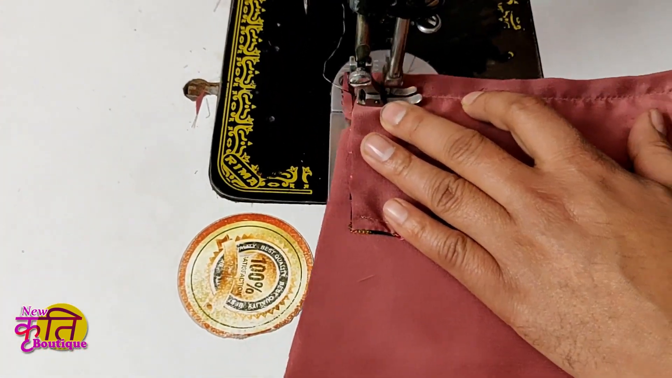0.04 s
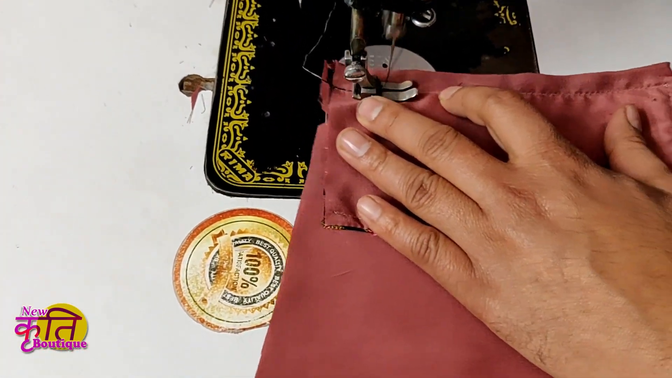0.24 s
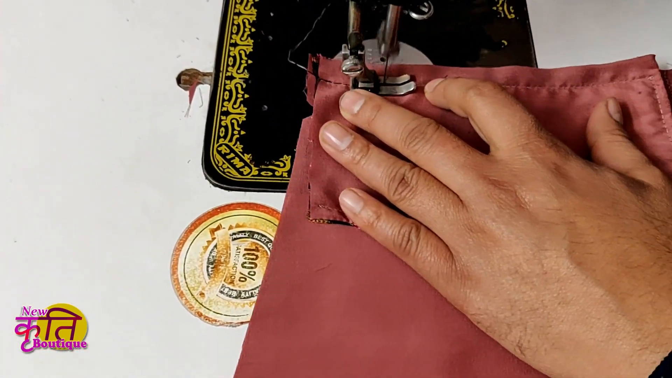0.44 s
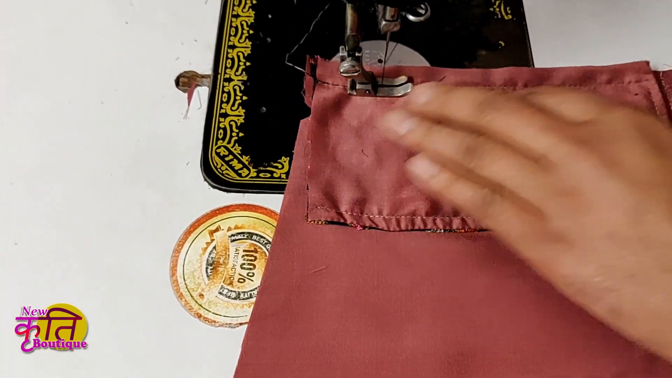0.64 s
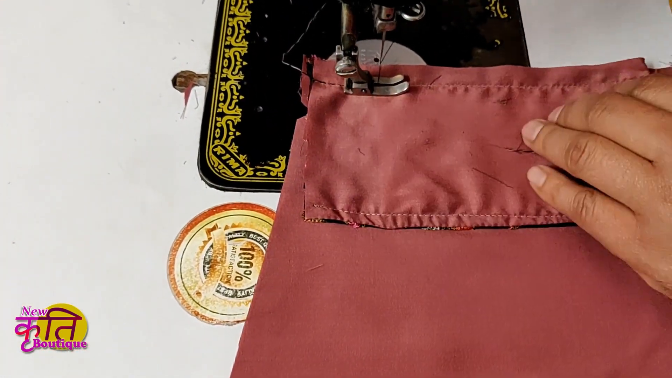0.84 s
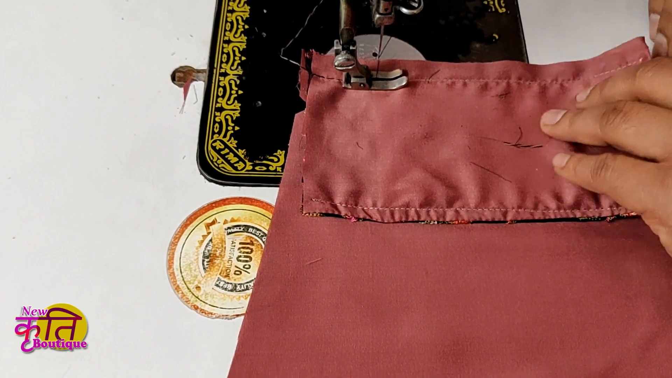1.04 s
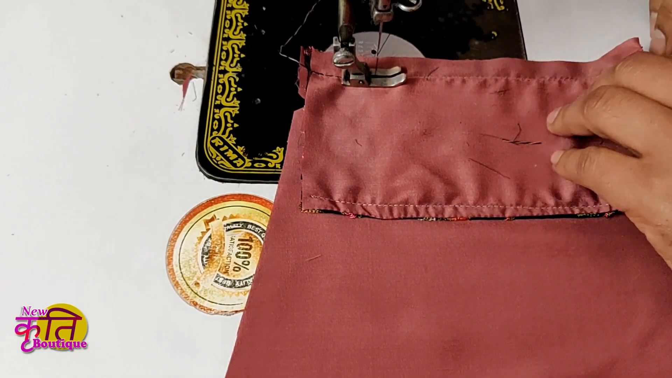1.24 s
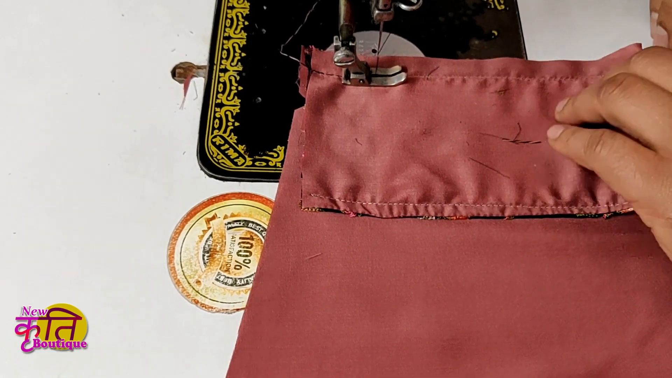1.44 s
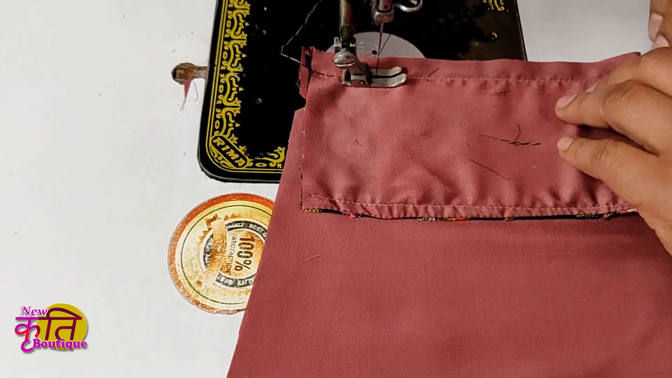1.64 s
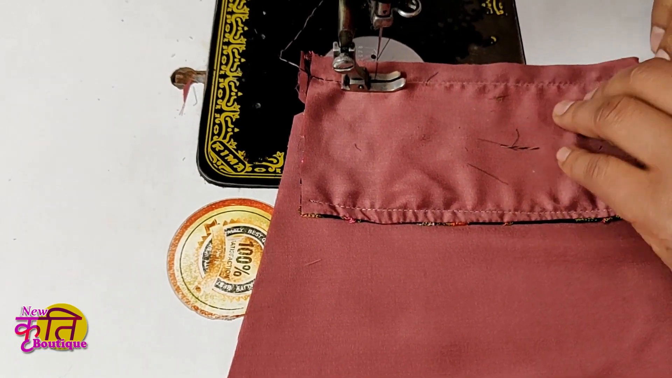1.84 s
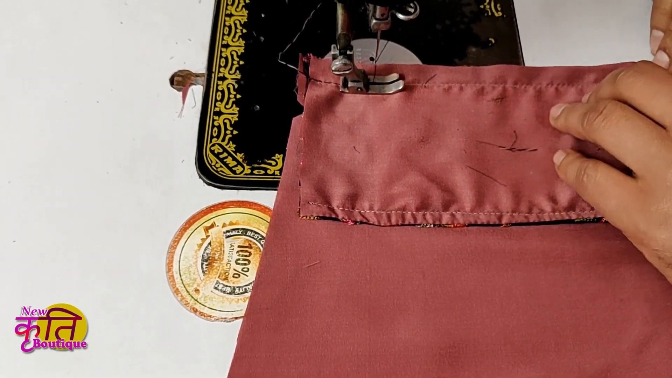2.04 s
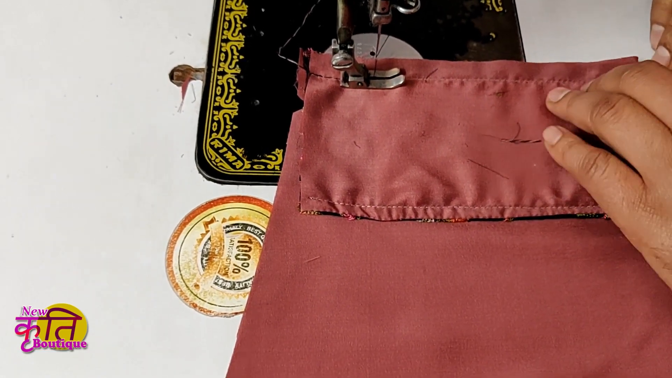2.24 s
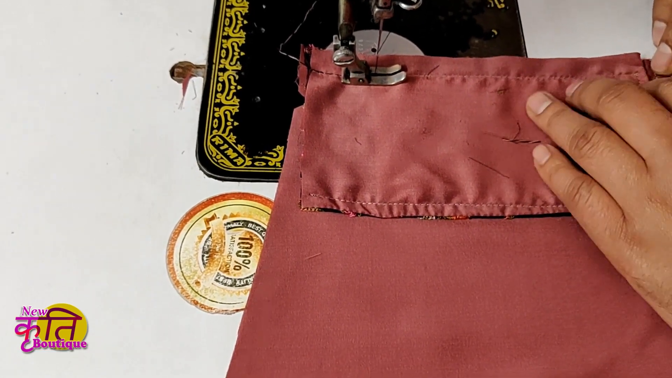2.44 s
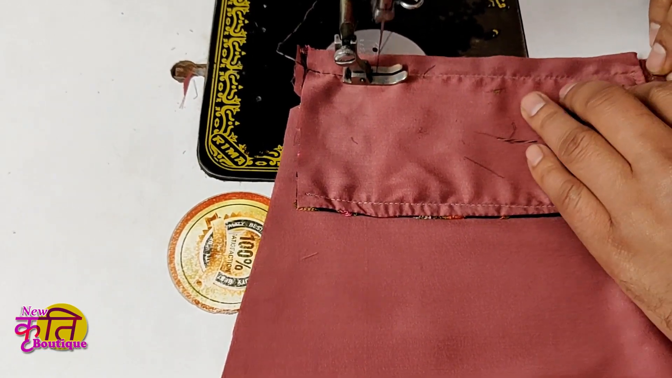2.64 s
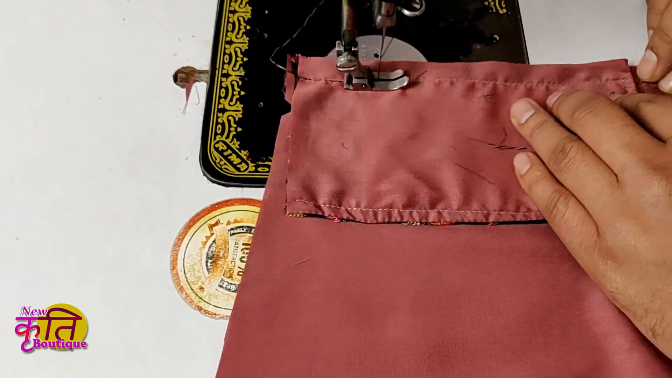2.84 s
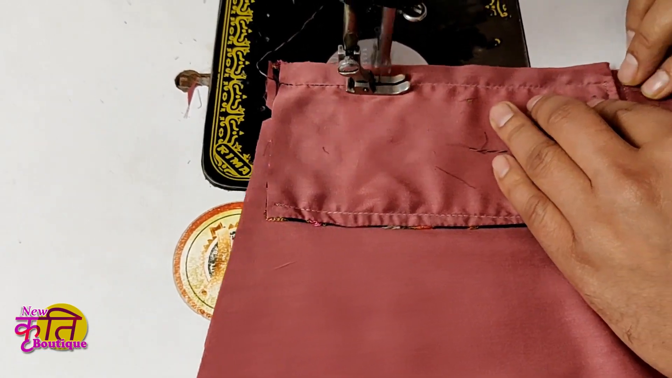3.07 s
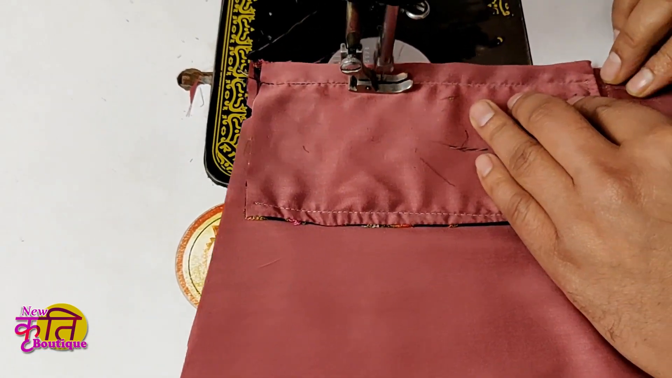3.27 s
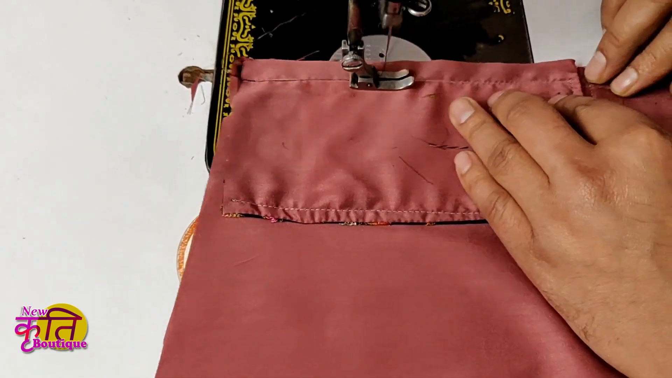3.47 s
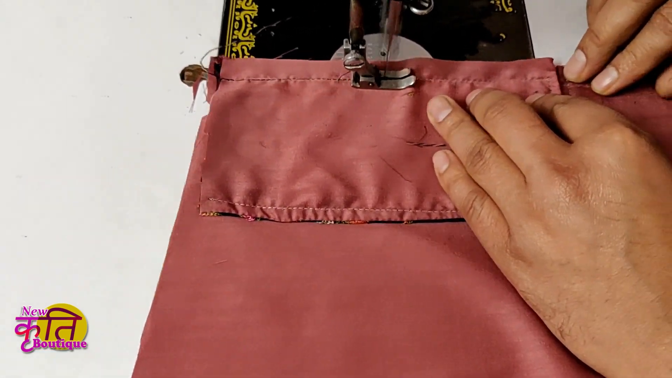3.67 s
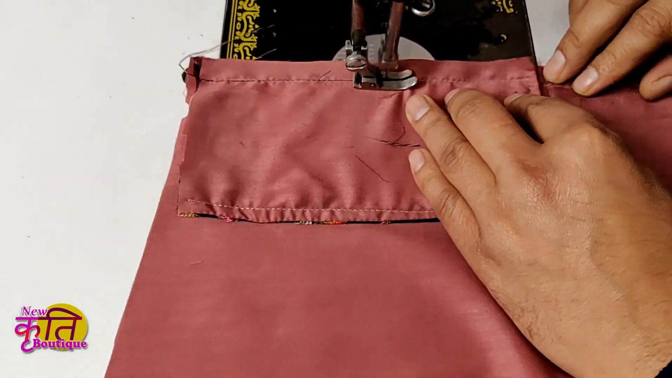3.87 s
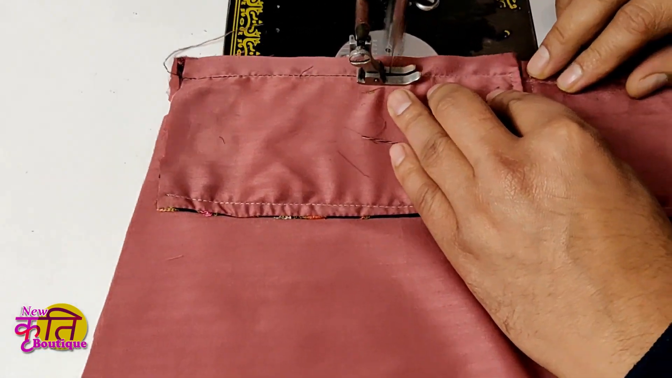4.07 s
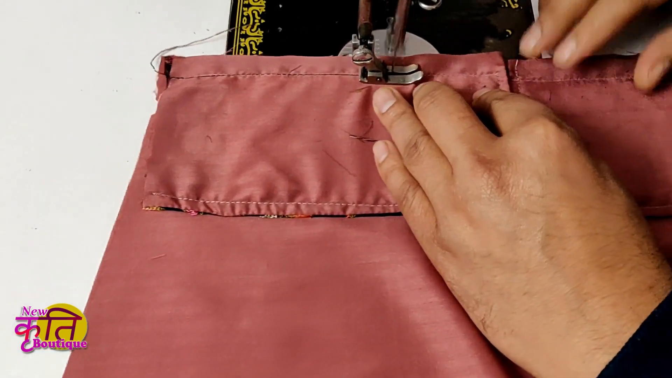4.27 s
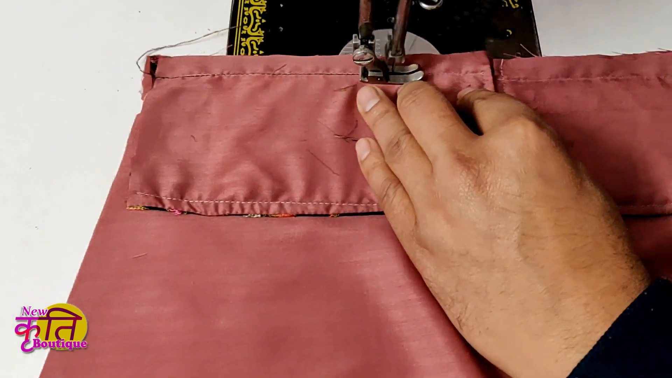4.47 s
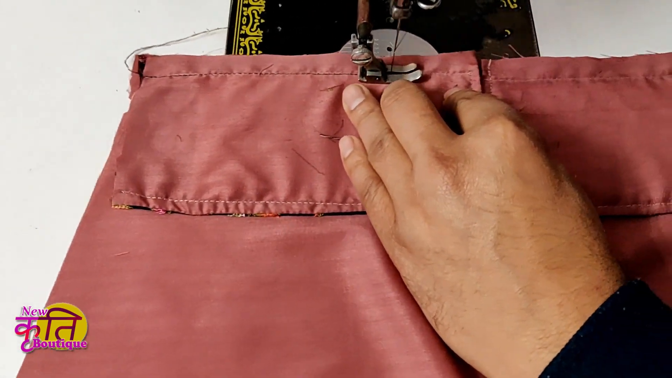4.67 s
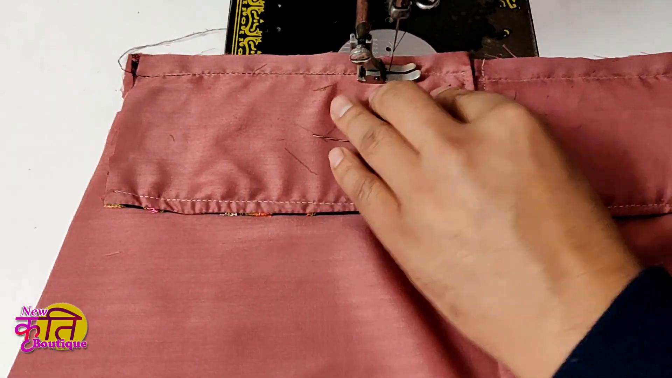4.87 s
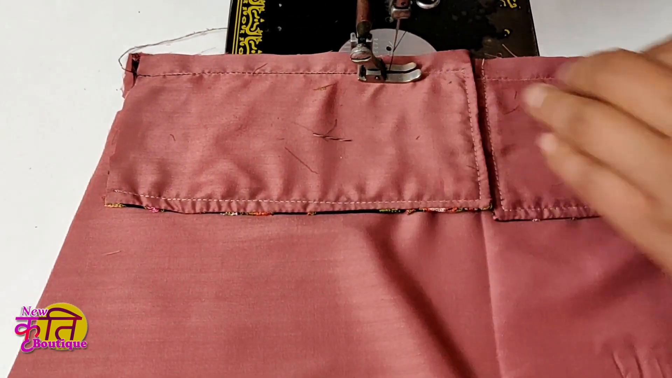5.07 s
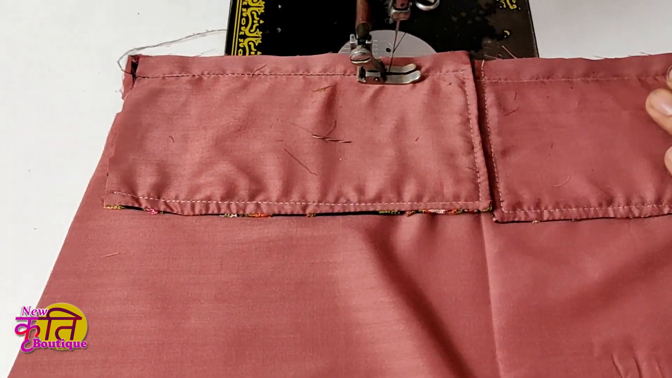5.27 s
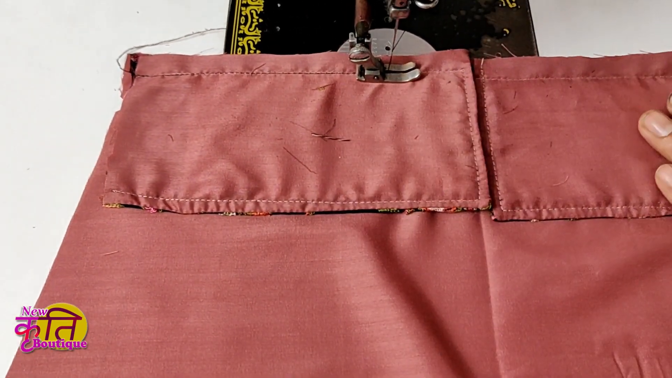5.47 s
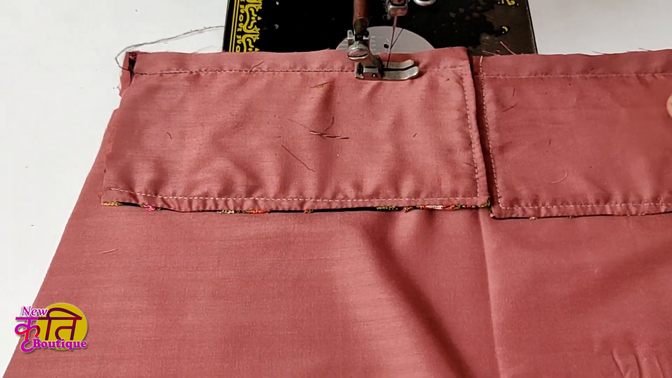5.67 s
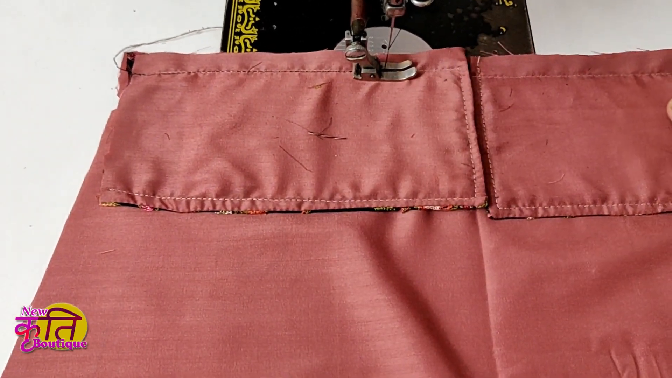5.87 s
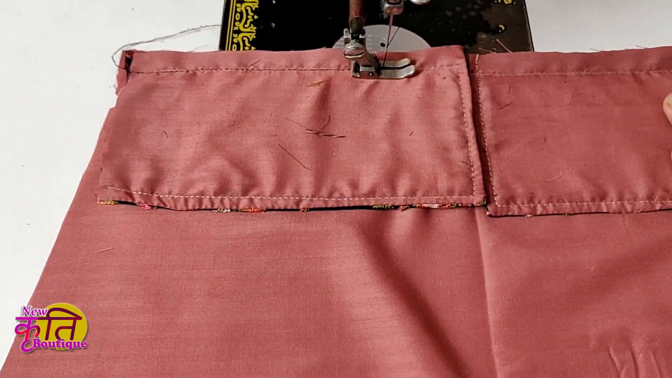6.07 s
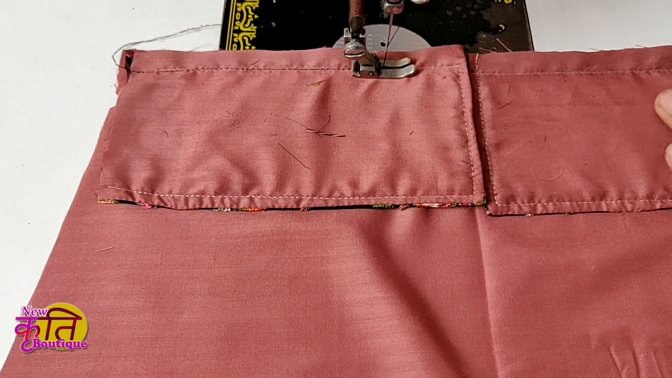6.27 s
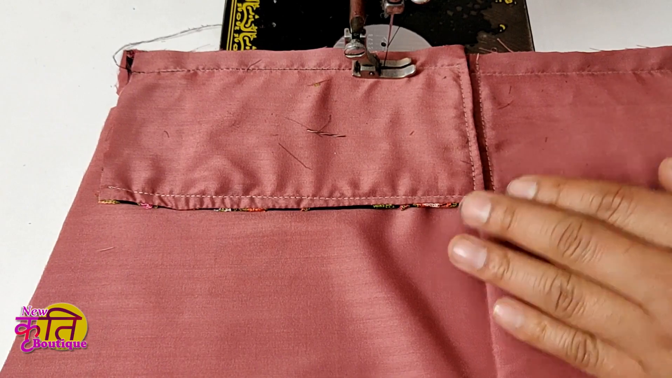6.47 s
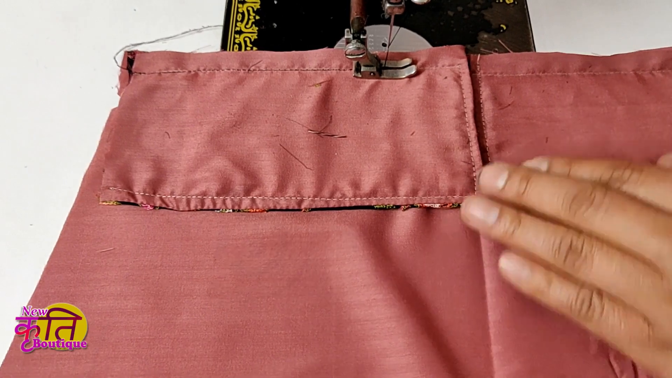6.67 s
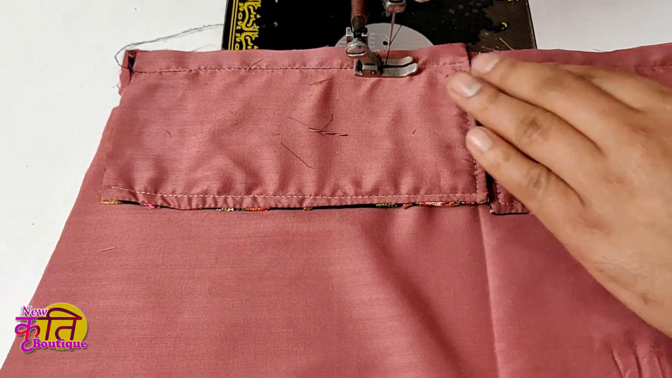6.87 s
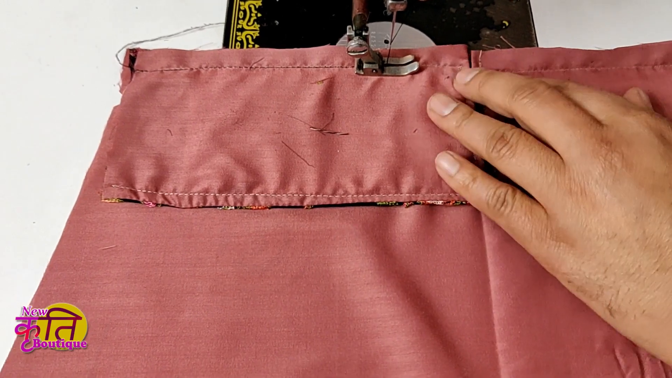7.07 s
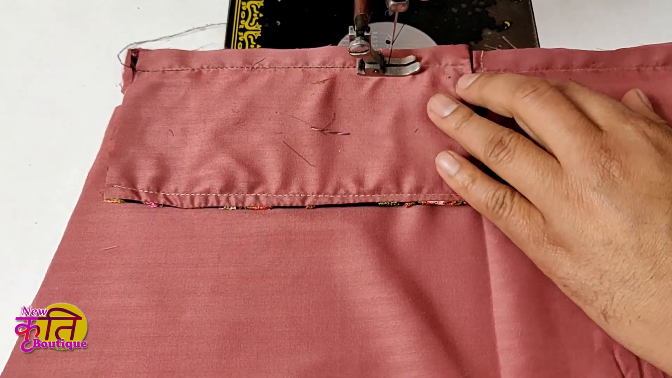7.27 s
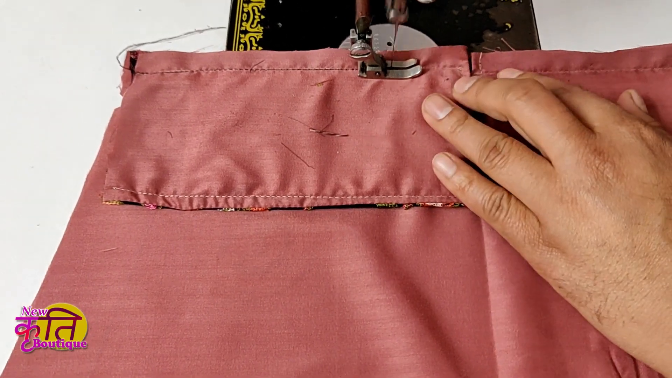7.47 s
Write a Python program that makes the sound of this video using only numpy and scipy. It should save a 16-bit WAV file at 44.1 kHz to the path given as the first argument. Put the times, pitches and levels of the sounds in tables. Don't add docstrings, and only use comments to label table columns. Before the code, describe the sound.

A sewing machine rattles to a stop, later runs fast through a longer seam, pauses, then starts again over a faint fan hum.

```python
import sys
import numpy as np
from scipy import signal
from scipy.fft import rfft, irfft, next_fast_len
from scipy.io import wavfile
from scipy.ndimage import uniform_filter1d, map_coordinates

SR = 44100
rng = np.random.default_rng(int(sys.argv[2]) if len(sys.argv) > 2 else 0)


def amp(db):
    return 10 ** (np.asarray(db, float) / 20)


def write(x):
    x = np.atleast_2d(x).T
    wavfile.write(sys.argv[1], SR, np.round(np.clip(x, -1, 1) * 32767).astype(np.int16))


N = 331191

# time in seconds, level in dB.
FAN_DRAUGHT = [(.6, -41.5), (1.1, -43.5), (1.8, -46), (2.15, -45), (5.0, -48.5), (5.4, -50.5), (6.3, -51),
               (6.7, -52), (7.0, -49.5)]
# pitch in Hz, waver in Hz, level in dB.
FAN_TONES = [(206.8, 1.027, -2.5), (216, 1.455, -3.5), (108.5, 3.27, -15.5), (282, 2.94, -19.5)]
# frequency in Hz, level in dB per Hz.
RUMBLE_SPECTRUM = [(13, -56), (22, -32), (75, -27), (90, -12), (118, -5), (153, 4), (184, -10), (195, -9.5),
                   (213, -4.5), (229, 3), (247, -9), (280, -11.5), (345, -32.5), (371, -45), (420, -34),
                   (550, -65), (920, -120)]
# frequency in Hz, level in dB per Hz.
AIR_SPECTRUM = [(210, -16), (350, 0), (379, -7.5), (445, -10.5), (719, -8.5), (779, -7), (1060, -15.5),
                (1180, -16.5), (3500, -28.5), (5140, -30), (16000, -35.5)]
# time in seconds, peak in dB, hollow
# knock in dB.
SNAPS = [(0.819, -48, -8), (0.824, -42.5, -17), (1.0254, -58, -0.5), (2.0394, -55, -3),
         (2.229, -54, -9), (2.249, -43, -7.5), (2.295, -35, -2), (2.5838, -28, -7),
         (4.6044, -37, -0.5), (4.7442, -57, 12.5), (5.0194, -54, -4), (5.0494, -53, -2),
         (3.294, -35, -1), (5.437, -38, -5.5), (6.011, -55, -12), (6.055, -58, -12), (7.03, -55.5, -5),
         (7.055, -53, -7), (7.127, -44, 2), (7.152, -43, 9.5)]
# frequency in Hz, level in dB per Hz.
CLICK_SPECTRUM = [(760, -37), (1300, 0), (1880, -8), (2110, -5), (2370, -5), (2850, -8.5), (3600, -4),
                  (5240, -9.5), (5730, -9.5), (6790, -11.5), (8720, -11), (9880, -32), (11000, -21),
                  (14300, -52), (22000, -120)]
# frequency in Hz, width in Hz, level in dB.
CLICK_RINGS = [(2150, 120, 4), (2800, 190, 5), (5150, 460, -2), (6750, 200, 8)]
# start in seconds, length in seconds, pitch in Hz,
# width in Hz, level in dB.
CREAKS = [(.457, .04, 4500, 900, -44), (.47, .085, 4400, 600, -54), (.575, .12, 3500, 350, -65),
          (.82, .06, 2600, 700, -56), (2.25, .11, 70, 40, -44), (1.78, .57, 45, 25, -54),
          (7.151, .02, 1900, 300, -44), (2.33, .5, 445, 60, -35), (1.95, .22, 1340, 30, -68),
          (2.395, .06, 990, 60, -36), (2.297, .025, 950, 150, -41), (4.77, .17, 2000, 40, -65),
          (5.288, .095, 1165, 40, -67), (6.6, .08, 696, 35, -63), (6.82, .15, 800, 30, -58),
          (6.8, .14, 1300, 140, -64), (6.94, .075, 500, 20, -53), (7.165, .045, 980, 90, -39),
          (7.245, .06, 990, 90, -40), (7.2, .3, 460, 90, -38)]
# start in seconds, peak in dB, pitch in Hz.
SQUEALS = [(2.4943, -33, 2740), (2.5157, -26.5, 2800), (2.5345, -28.5, 2800), (2.5536, -29, 2810),
           (2.5736, -33, 3030), (2.5917, -33, 3100), (7.322, -34, 2580), (7.3351, -36, 2695),
           (7.353, -29.5, 2800), (7.373, -30, 2825), (7.3896, -28, 2880), (7.4111, -29, 2930),
           (7.4325, -36, 3027), (7.451, -35, 3130)]
# time in seconds, speed in stitches per second.
SPEED = [
    [(.0173, 19.96), (.22, 15.25), (.28, 12.93), (.4, 15.88), (.5836, 4.33)],
    [(2.3216, 8.43), (2.47, 5.0), (3.03, 19.31), (3.29, 17.96), (3.54, 21.47), (3.67, 22.07), (3.91, 18.76),
     (4.57, 11.64), (4.783, 3.9)],
    [(7.1494, 7.19), (7.4546, 5.9)],
]
# time in seconds, iron body level in dB.
EFFORT = [
    [(0.0, -21), (.16, -24.5), (.3, -27), (.4, -37), (.55, -63), (.62, -63)],
    [(2.29, -54), (2.316, -48), (2.324, -34.5), (2.55, -30.5), (2.88, -23.5), (3.25, -23.5), (3.57, -22),
     (4.3, -26), (4.67, -30), (4.93, -83.5)],
    [(7.145, -49), (7.168, -37), (7.182, -32), (7.22, -35.5), (7.28, -33), (7.34, -33.5), (7.45, -29.5),
     (7.51, -29)],
]
# share of the turn, knock in dB, tick in dB.
CONTACTS = [
    (0.0, -3.5, -33),
    (0.268, -7, -23),
    (.52, -2, -41),
    (0.761, -11, -16.5),
]
# cycles per turn, start in seconds, length in seconds, level in dB.
WHINES = [
    (42.05, 3.331, 0.55, -25.5),
    (33.3, 3.45, 0.3, -28),
]
# time in seconds, peak in dB, pitch in Hz.
BOOMS = [(0.04, -6.5, 155), (0.094, -12, 156.4), (0.156, -11.5, 143.6), (0.21, -9.5, 140.4),
         (2.823, -21, 146.2), (3.014, -2, 144.3), (3.138, -35, 187.1), (3.284, -10, 150.1),
         (3.322, -16, 156.7), (3.38, -7, 149.7), (3.429, -20, 136.4), (3.485, -12, 166),
         (3.526, -14, 164.4), (3.575, -22, 173.4), (3.619, -8, 141.5), (3.666, -11, 173.2),
         (3.714, -7, 164.5), (3.763, -10.5, 160.7), (3.819, -10, 147.6), (3.876, -15, 139.5),
         (3.926, -22, 142.9), (3.983, -11, 145.7), (4.04, -23, 141), (4.092, -12, 145.3),
         (4.145, -13.5, 145.7), (4.211, -10.5, 143), (4.254, -29, 134.5)]
# time in seconds, peak in dB, pitch in Hz.
KNOCKS = [(0.045, -3, 304.7), (0.089, -6, 288.6), (0.129, -14, 261), (0.239, -16, 284.7), (0.275, -17, 283),
          (0.324, -17, 458), (2.324, -20, 288.3), (2.345, -18, 459), (2.461, -28, 458), (2.748, -22, 319.7),
          (2.795, -18, 293.8), (2.842, -8.5, 297), (2.895, -20, 291), (3.018, -7, 331.2),
          (3.077, -6, 297.2), (3.113, -8, 292.5), (3.161, -4, 295.4), (3.24, -24, 377.4),
          (3.298, -17, 342.7), (3.336, -8, 297), (3.386, -6.5, 309.5), (3.43, -5, 297.8), (3.484, -12, 291),
          (3.529, -3, 290.7), (3.569, -6, 345.4), (3.621, -4, 282.8), (3.669, -8, 282), (3.719, -12, 285.2),
          (3.762, -8.5, 343.8), (3.823, -4.5, 300.5), (3.861, -4, 293.4), (3.937, -12, 361.4),
          (4.0, -18, 348), (4.059, -9, 313.2), (4.117, -17, 308.3), (4.345, -14, 301.4),
          (4.386, -17, 325.6), (4.447, -15, 308.1), (4.538, -10, 295.5), (4.629, -17.5, 361.3),
          (7.165, -21.5, 484), (7.263, -19, 456), (7.299, -27, 459.7), (7.376, -20, 442.5),
          (7.419, -21, 292.5), (7.449, -19, 372), (7.467, -21.5, 349)]
# time in seconds, peak in dB, pitch in Hz.
CLANKS = [(.018, -24, 2700), (.068, -25, 2460), (.12, -30, 1000), (.249, -22, 1580), (.459, -35, 4450),
          (.46, -38.5, 4900), (2.298, -32, 1897), (2.315, -30, 1930), (2.32, -29, 1730), (2.378, -33, 1910),
          (2.395, -35, 2800), (2.407, -33, 2800), (2.415, -34, 1975), (2.468, -31, 1774),
          (2.585, -32, 1703), (2.716, -23, 1590), (2.796, -17, 1790), (2.99, -26, 1870), (3.09, -34, 1700),
          (3.144, -19, 1670), (3.239, -28, 2470), (3.294, -33, 1940), (3.455, -17, 2840),
          (3.696, -29, 1981), (4.004, -23, 4200), (4.12, -17.5, 2896), (4.181, -31, 1935),
          (4.33, -22, 2014), (4.384, -24, 1653), (4.438, -25, 3700), (4.457, -23, 1967), (4.51, -26, 2062),
          (4.545, -18, 993), (4.604, -27, 1915), (4.632, -29, 2007), (4.783, -40, 1930), (7.152, -30, 1864),
          (7.175, -30, 966), (7.243, -32, 6570), (7.25, -23, 978.4), (7.46, -16, 991)]
# time in seconds, peak in dB, pitch in Hz.
HOOK_RINGS = [(2.5864, -26, 6250), (2.6178, -29, 6740), (2.7949, -26, 6200), (3.0423, -26, 6500),
              (3.0907, -29, 6540), (3.1434, -26, 6400), (3.2548, -28, 6380), (3.3104, -25, 6300),
              (3.4699, -25, 6390), (3.515, -31, 6230), (3.643, -30, 6560), (3.6958, -22, 6470),
              (3.744, -26, 5930), (3.7922, -28, 6420), (3.9461, -28, 5990), (4.0034, -26, 6525),
              (4.182, -29, 5935), (4.2588, -28, 6510), (4.3842, -25, 6567), (4.4398, -32, 6146),
              (4.6317, -28, 7140)]
# time in seconds, peak in dB.
STITCH_TICKS = [(0.0177, -20), (0.067, -19), (0.1244, -30), (0.182, -21), (0.25, -16), (0.324, -19),
                (0.3922, -20), (0.461, -38), (2.32, -24.5), (2.4693, -23), (2.6183, -17), (2.67, -23),
                (2.7163, -18), (2.774, -18), (2.796, -19), (2.829, -25), (2.867, -20), (2.8966, -30),
                (2.9273, -19.5), (2.9627, -22), (2.9912, -14), (3.044, -15), (3.0903, -14.5), (3.144, -17),
                (3.1981, -33), (3.24, -30), (3.2541, -28), (3.3112, -25), (3.3344, -31), (3.414, -19),
                (3.4642, -15), (3.514, -16.5), (3.5596, -15.5), (3.6426, -31), (3.696, -16.5),
                (3.7442, -22), (3.794, -18), (3.8425, -17.5), (3.9463, -20.5), (4.0046, -16.5),
                (4.0577, -25), (4.1195, -18.5), (4.1809, -18.5), (4.246, -16.5), (4.3108, -19.5),
                (4.3635, -23), (4.3824, -15.5), (4.4171, -20), (4.4377, -21), (4.4588, -18), (4.4963, -24),
                (4.544, -20), (4.6323, -15.5), (4.7834, -33.5)]
# time in seconds, peak in dB.
LONE_TICKS = [(0.581, -56), (2.298, -35), (4.746, -47), (2.336, -25), (2.446, -26), (2.586, -20),
              (4.518, -22), (4.605, -19), (7.138, -25), (7.152, -37), (7.164, -33), (7.174, -31),
              (7.242, -29), (7.431, -22), (7.463, -20.5)]
# frequency in Hz, level in dB per Hz.
TICK_SPECTRUM = [(1200, -21), (2500, -1), (4500, -1.5), (7500, -0.5), (9500, -7), (13000, -18), (15500, 0),
                 (16000, -53)]
# frequency in Hz, level in dB per Hz.
BRIGHT_SPECTRUM = [(1530, -14), (2600, -6.5), (3290, -3.5), (3660, -1), (4850, -1.5), (5310, -6), (6470, 0),
                   (7150, -3.5), (8450, -6.5), (10100, -13.5), (10900, -20), (12400, -13), (13500, -21),
                   (15100, -8.5), (16000, -43)]
# motor on in seconds, slack gone in seconds, level in dB.
SLACK = [
    (2.34, 2.608, -0.5),
    (7.14, 7.235, -3),
]
# frequency in Hz, level in dB per Hz.
IRON_SPECTRUM = [(240, -18), (400, -1), (610, -1.5), (686, -2.5), (772, -7.5), (899, -2), (1240, -9),
                 (1370, -9.5), (1540, -11), (1970, -10), (2210, -16.5), (2430, -14.5), (3000, -15.5),
                 (3900, -59), (6600, -120)]
# frequency in Hz, width in Hz, level in dB.
IRON_RINGS = [(470, 57, -17), (556, 37, -13.5), (705, 20, 0.5), (900, 3, -33), (935, 5.6, 1.5),
              (1353, 56, 0.5), (1730, 22, -8), (2014, 15.4, 4.5), (2460, 28, -0.5)]
# frequency in Hz, level in dB, decay T60 in seconds.
TABLE_MODES = [(144.4, 3.5, 0.41), (161.8, 1.5, 0.12), (192.8, -6.5, 0.36), (241, 0.5, 0.048),
               (292.5, 3.5, 0.14), (335.5, 2, 0.38), (350.5, -1.5, 0.12), (445.3, -8.5, 0.089)]
# time in seconds, peak in dB.
THUMPS = [
    (0.041, -14.5),
    (3.011, -31),
]
# start in seconds, length in seconds, level in dB.
SWAYS = [(.05, 0.17, -25.5), (0.266, 0.06, -30), (2.284, 0.29, -31), (2.534, 0.23, -34),
         (3.043, 0.083, -33), (3.16, 0.2, -23.5), (3.583, 0.073, -38), (3.795, 0.44, -30),
         (4.247, 0.09, -30), (7.134, 0.21, -28), (7.374, 0.17, -37)]
# start in seconds, length in seconds, level in dB.
LEANS = [
    (0.284, 0.042, -11),
    (2.3, 0.069, 7),
    (2.979, 0.16, 4),
    (3.417, 0.35, 2.5),
    (3.943, 0.18, 4.5),
    (4.264, 0.37, -4),
    (4.72, 0.22, 16.5),
    (7.162, 0.29, -4.5),
]
# frequency in Hz, left-right likeness from -1 to 1.
LIKENESS = [(60, 0.78), (130, 1), (290, 0.85), (640, 0.31), (1410, -0.32), (3100, 0.16), (6820, -0.026),
            (15000, -0.26)]
# frequency in Hz, left minus right in dB.
LEFT_LEAN = [(60, 15.5), (92, 0), (140, 0.5), (210, -0.5), (330, -1.5), (500, -2), (770, 1.5), (1170, 1.0),
             (1790, 2.5), (2740, -2.5), (4190, 1.0), (6410, 3.5), (9810, -3), (15000, 0)]
# frequency in Hz, margin under the neighbours in dB.
MASK_MARGIN = [(20, 60), (1500, 30), (2600, 6), (7000, 3.5), (10000, -1), (16000, -1)]

# dB at mean effort, share of the effort, dB per doubling of speed.
KNOCK_LAW, BRIGHT_LAW, SWAY_LAW = (-22.5, 0.87, 3.2), (-34.5, 0.91, -0.14), (-35, 0.54, 1.7)
MEAN_EFFORT_DB, MEAN_STITCHES_PER_S = -26, 16


def rms_one(x):
    return x / np.sqrt(np.mean(x ** 2) + 1e-20)


def in_time(*tables):
    s, *columns = np.transpose(np.vstack(tables))
    return [np.interp(np.arange(N) / SR, s, c) for c in columns]


def at_hz(points, hz):
    points_hz, value = np.transpose(points)
    return np.interp(np.log(hz + 1), np.log(points_hz), value)


def drift(rate_hz):
    knots = rng.standard_normal(int(N / SR * 60) + 2)[:int(N / SR * rate_hz) + 2]
    return map_coordinates(knots, [np.arange(N) / SR * rate_hz], order=3, mode="nearest")


def swell(start_s, length_s):
    return np.sin(np.pi * np.clip((np.arange(N) / SR - start_s) / length_s, 0, 1))


def clicks(s, size):
    out = np.zeros(N)
    np.add.at(out, np.clip((np.asarray(s) * SR).astype(int), 0, N - 1), size)
    return out


def band(x, order, low_hz, high_hz):
    return signal.sosfilt(signal.butter(order, [low_hz, high_hz], "band", fs=SR, output="sos"), x)


def resonance(x, hz, width_hz):
    r = np.exp(-np.pi * width_hz / SR)
    zeros = (1 - r * r) / 2 * np.array([1, 0, -1])
    poles = [1, -2 * r * np.cos(2 * np.pi * hz / SR), r * r]
    return signal.lfilter(zeros, poles, x + 1e-18)


def evened(x, span_s):
    power = uniform_filter1d(np.mean(np.atleast_2d(x) ** 2, axis=0), int(span_s * SR))
    return x / np.sqrt(power + 1e-4 * power.mean())


def stereo_noise(spectrum):
    direct_db, left_lead_s = -1.5, .00009
    size = next_fast_len(N)
    hz = np.arange(size // 2 + 1) * SR / size
    sign = np.array([[1], [-1]])
    alike = np.clip(at_hz(LIKENESS, hz), -1, 1)
    mid, side, direct = rfft(rng.standard_normal((3, size))) * amp(at_hz(spectrum, hz))
    pair = np.sqrt(1 + alike) * mid + np.sqrt(1 - alike) * side * sign
    pair += amp(direct_db) * direct * np.exp(1j * np.pi * hz * left_lead_s * sign)
    pair *= amp(at_hz(LEFT_LEAN, hz) / 2 * sign)
    return rms_one(irfft(pair, size)[:, :N])


def shifting(x, patchy_db):
    lines = signal.stft(x, nperseg=512)[2]
    luck = uniform_filter1d(rng.standard_normal(lines.shape[1:]), size=3, axis=0)
    luck = uniform_filter1d(luck, size=6, axis=1)
    gain = amp(patchy_db * rms_one(luck) - patchy_db ** 2 / 8.7)
    return signal.istft(lines * gain, nperseg=512)[1][:, :N]


def dying(blows, crack_s, wet_db):
    room_t60_s, echo_delay_s = 0.46, 0.013
    crack = signal.lfilter([1], [1, -np.exp(-2 / (crack_s * SR))], blows ** 2)
    late = np.roll(blows, int(echo_delay_s * SR)) ** 2
    echoes = signal.lfilter([1], [1, -amp(-120 / (room_t60_s * SR))], late)
    return np.sqrt(crack + amp(2 * wet_db) * echoes)


def stitch_times():
    out = []
    for rows in SPEED:
        s, speed = np.transpose(rows)
        t = np.arange(s[0], s[-1], 1 / SR)
        turns = np.cumsum(np.interp(t, s, speed)) / SR
        out.append(np.interp(np.arange(round(turns[-1]) + 1), turns, t))
    return np.concatenate(out)


def contact_times():
    s = stitch_times()
    turn_s = np.minimum(np.diff(s, append=s[-1] + 0.18), .16)
    slop = rng.normal(0, 1, (len(s), len(CONTACTS))) * .012
    return s[:, None] + turn_s[:, None] * (np.array(CONTACTS)[:, 0] + slop)


def follow(law):
    (effort_db,), (speed,) = in_time(*EFFORT), in_time(*SPEED)
    base_db, effort_share, db_per_doubling = law
    return (base_db + effort_share * (effort_db - MEAN_EFFORT_DB)
            + db_per_doubling * np.log2(speed / MEAN_STITCHES_PER_S))


def grains(per_s, spread_db, times, pulse_db):
    after = signal.lfilter([1], [1, -np.exp(-1 / (0.018 * SR))], clicks(times.ravel(), 0.58))
    sizes = amp(spread_db * np.minimum(rng.exponential(1, N), 4) + pulse_db * np.minimum(after, 1))
    return sizes * rng.choice([-1, 1], N) * (rng.random(N) < per_s / SR)


def fan():
    rumble_db, = in_time(FAN_DRAUGHT)
    swing_db = rumble_db - rumble_db.mean()
    tones_db = -44 - 0.16 * swing_db
    air_db = -58.5 + 0.33 * swing_db
    tones = np.zeros(N)
    for hz, waver_hz, level_db in FAN_TONES:
        level = amp(level_db + 4.5 + 2.0 * drift(5))
        tones += level * np.sin(2 * np.pi * np.cumsum(hz + waver_hz * drift(7)) / SR)
    rumble = stereo_noise(RUMBLE_SPECTRUM) * amp(rumble_db + 8.0 + 1.0 * drift(6.4))
    air = stereo_noise(AIR_SPECTRUM) * amp(air_db + 3.5 + 1.0 * drift(2.86))
    return amp(tones_db) * tones + rumble + air


def snaps():
    s, peak_db, hollow_db = np.transpose(SNAPS)
    rise = int(.0045 * SR)
    noise = stereo_noise(CLICK_SPECTRUM)
    noise = rms_one(noise + sum(amp(db) * resonance(noise, hz, width_hz) for hz, width_hz, db in CLICK_RINGS))
    snap = dying(clicks(s, amp(peak_db - 7.0)), 0.026, wet_db=-8.0)
    snap = uniform_filter1d(snap, rise, origin=rise // 2 - 1)
    hollow_spectrum = [(600, -34), (780, 7.0), (860, 10.5), (1150, 0.0), (1400, -37.0)]   # Hz, dB per Hz
    hollow = uniform_filter1d(dying(clicks(s, amp(peak_db + hollow_db)), 0.0091, wet_db=-2.0), rise)
    return shifting(noise * snap, patchy_db=3.0) + stereo_noise(hollow_spectrum) * hollow


def belt():
    slip_s, slip_rise_hz, roughness, slip_db = .014, 159, 0.32, 1.7
    t, out = np.arange(N) / SR, np.zeros(N)
    share = np.arange(int(slip_s * SR)) / (slip_s * SR)
    grit = 1 + roughness * rms_one(resonance(rng.standard_normal(N), 150, 300))
    for (s, peak_db, hz), turn in zip(SQUEALS, rng.random(len(SQUEALS))):
        chirp = np.sin(2 * np.pi * (turn + np.cumsum(hz + slip_rise_hz * (share - .5)) / SR))
        shape = np.sin(np.pi * share ** .8) ** 2
        out[int((s - .003) * SR):][:len(share)] += amp(peak_db + slip_db) * shape * chirp
    out = out * grit + amp(-8.0) * np.roll(out, int(.0074 * SR))
    white = rng.standard_normal(N)
    for s, length_s, hz, width_hz, level_db in CREAKS:
        rise = np.sin(np.pi * np.clip((t - s) / length_s, 0, 1) ** 0.68)
        creak = resonance(resonance(white, hz, width_hz), hz, width_hz)
        out += amp(level_db) * rise * evened(creak, 0.19)
    return np.array([out, np.roll(out, 4)])


def gears():
    turns = np.cumsum(in_time(*SPEED)[0]) / SR
    throb = amp(3.0 * np.sin(2 * np.pi * turns) + 2.5 * drift(25))
    tones = np.zeros(N)
    for teeth, s, length_s, level_db in WHINES:
        tone = np.sin(2 * np.pi * teeth * turns + 2.6 * drift(18))
        tones += amp(level_db) * swell(s, length_s) ** 0.35 * tone
    return np.array([throb * tones, throb * np.roll(tones, 4)])


def ping(times):
    hz, width_hz, level_db = 8130, 160, -18.5
    blows = clicks(times[:, ::2].ravel(), 0.54) * swell(2.62, 0.53)
    ring = amp(level_db) * resonance(blows, hz, width_hz) * SR / width_hz / np.pi
    return np.array([amp(-13) * np.roll(ring, 3), ring])


def struck(rows, t60_s, rise_cycles, trim_db):
    out, t = np.zeros(N + SR), np.arange(SR // 4) / SR
    s, peak_db, hz = np.transpose(rows)
    turns = np.cumsum(np.append(0, hz[:-1] * np.diff(s)))
    turns = turns + rng.random() + .08 * rng.standard_normal(len(s))
    for s, peak_db, hz, turn in zip(s, peak_db, hz, turns):
        shape = (1 - np.exp(-t * hz / rise_cycles)) * amp(-60 * t / t60_s)
        ring = shape / shape.max() * np.sin(2 * np.pi * (hz * t + turn))
        out[int(s * SR):int(s * SR) + len(t)] += amp(peak_db + trim_db) * ring
    return out[:N]


def strokes():
    wood = struck(BOOMS, 0.16, rise_cycles=1.16, trim_db=-4.5)
    wood += struck(KNOCKS, 0.22, rise_cycles=0.54, trim_db=-8)
    metal = [struck(CLANKS, 0.082, rise_cycles=0.74, trim_db=-5.5) for side in range(2)]
    hook = [struck(HOOK_RINGS, 0.02, rise_cycles=3.0, trim_db=-3) for side in range(2)]
    return wood + np.array(metal) + np.array(hook)


def rattle(times, bright_db):
    chatter_size = dying(grains(900, 2.6, times, pulse_db=2), 0.0034, wet_db=-15)
    chatter = stereo_noise(BRIGHT_SPECTRUM) * chatter_size
    chatter = shifting(amp(bright_db + 2.5) * evened(chatter, 0.091), patchy_db=2.2)
    small_db = bright_db[np.minimum(times * SR, N - 1).astype(int)] + 20.0
    small_db = small_db + np.array(CONTACTS)[:, 2] + 2.0 * rng.normal(0, 1, times.shape)
    stitch_s, stitch_db = np.transpose(STITCH_TICKS)
    lone_s, lone_db = np.transpose(LONE_TICKS)
    ticks = clicks(stitch_s, amp(stitch_db + 1.5)) + clicks(times.ravel(), amp(small_db).ravel())
    ticks += clicks(lone_s, amp(lone_db))
    crack = amp(-3.5) * band(ticks, 2, 1500, 9000)
    ring = amp(-4.5) * stereo_noise(TICK_SPECTRUM) * dying(ticks, 0.0033, wet_db=-22)
    return np.array([crack, np.roll(crack, 4)]) + chatter + ring


def iron(times, body_db):
    chatter_size = dying(grains(540, 2.1, times, pulse_db=3), 0.0039, wet_db=-13.5)
    body = stereo_noise(IRON_SPECTRUM) * chatter_size
    body = body + sum(amp(db - 0.5) * resonance(body, hz, width_hz) for hz, width_hz, db in IRON_RINGS)
    return amp(body_db) * evened(body, 0.063)


def table(times, knock_db, sway):
    deeper_when_fast_db = 4.0
    stitch_s = stitch_times()
    turns = np.interp(np.arange(N) / SR, stitch_s, np.arange(len(stitch_s)))
    doublings = np.log2(in_time(*SPEED)[0] / MEAN_STITCHES_PER_S)
    modes = np.zeros(N)
    for hz, level_db, t60_s in TABLE_MODES:
        strength = amp(np.array(CONTACTS)[:, 1] + 4.2 * rng.normal(0, 1, times.shape))
        push = rms_one(clicks(times.ravel(), strength.ravel()))
        push += amp(11.5) * rng.standard_normal(N)
        push += amp(-25.0) * np.sin(16 * np.pi * turns)
        level = amp(level_db + deeper_when_fast_db * doublings * np.log2(260 / hz))
        modes += level * rms_one(resonance(push, hz, np.log(1000) / np.pi / t60_s))
    knock = amp(knock_db) * evened(modes, 0.061)
    knock += sway * evened(resonance(resonance(push, 94.0, 29.0), 107.0, 33), 0.027)
    thump_s, thump_db = np.transpose(THUMPS)
    jolt = clicks(thump_s, amp(thump_db) * SR)
    knock += amp(-33.0) * resonance(jolt, 187.0, 7.8) + amp(-38.5) * resonance(jolt, 278.0, 20.0)
    knock = band(knock, 3, 80, 1000)
    knock += amp(knock_db - 28.0) * rms_one(resonance(resonance(push, 29, 14), 34, 20))
    side = amp(-16.5) * resonance(np.roll(knock, int(0.0107 * SR)), 240, 510)
    return np.array([knock + side, knock - side])


def scene():
    t = np.arange(N) / SR
    running = sum((t >= rows[0][0]) & (t <= rows[-1][0]) for rows in EFFORT)
    settle_db = -7.0 * swell(4.26, 0.62)
    knock_db = follow(KNOCK_LAW) + sum(db * swell(s, length_s) for s, length_s, db in LEANS)
    sway = amp(follow(SWAY_LAW) + settle_db)
    sway = sway + sum(amp(db) * swell(s, length_s) ** 2 for s, length_s, db in SWAYS)
    bright_db = follow(BRIGHT_LAW) + sum(db * (t > on_s) * (t < taut_s) for on_s, taut_s, db in SLACK)
    times = contact_times()
    machine = table(times, knock_db, sway) + ping(times) + rattle(times, bright_db)
    machine += shifting(iron(times, in_time(*EFFORT)[0]), patchy_db=1.5)
    machine = uniform_filter1d(1. * running, 800) * machine
    return fan() + snaps() + belt() + gears() + strokes() + machine


def starved(x, hearing_db, margin_db, patchy_db):
    frame, grid = 1024, 824
    n, k = np.arange(2 * frame), np.arange(frame)
    window = signal.windows.kaiser_bessel_derived(2 * frame, 4 * np.pi)
    cosines = np.cos(np.pi / frame * np.outer(n + .5 + frame / 2, k + .5))
    basis = (np.sqrt(2 / frame) * window[:, None] * cosines).astype(np.float32)
    lead = 2 * frame - grid
    halves = np.pad(x, [(0, 0), (lead, 2 * frame - (N + lead) % frame)]).reshape(2, -1, frame)
    lines = np.concatenate([halves[:, :-1], halves[:, 1:]], axis=2).astype(np.float32) @ basis
    bands = np.mean(lines ** 2, axis=0).reshape(-1, frame // 16, 16).mean(axis=2)
    spread = uniform_filter1d(uniform_filter1d(bands, size=9, axis=1), size=2, axis=0)
    masking_db = 10 * np.log10(spread + 1e-20)
    luck = rms_one(uniform_filter1d(rng.standard_normal(bands.shape), size=4, axis=0))
    masked_db = np.repeat(masking_db + patchy_db * luck, 16, axis=1)
    masked_db = masked_db - at_hz(margin_db, (k + .5) * SR / 2 / frame)
    lines *= np.abs(lines) > amp(np.maximum(masked_db, hearing_db))
    back = lines @ basis.T
    halves[:, 1:-1] = back[:, 1:, :frame] + back[:, :-1, frame:]
    return halves.reshape(2, -1)[:, lead:lead + N]


def top_cut(x):
    return signal.sosfilt(signal.butter(12, 17090, fs=SR, output="sos"), x)


def record(dry):
    rounded = 1.151 * np.tanh(dry / 1.24)
    cut = signal.sosfilt(signal.cheby2(16, 60, 16500, fs=SR, output="sos"), rounded)
    mix = starved(cut, hearing_db=-67, margin_db=MASK_MARGIN, patchy_db=4.5)
    return top_cut(mix)


dry = scene()
out = record(dry)
write(out)
```